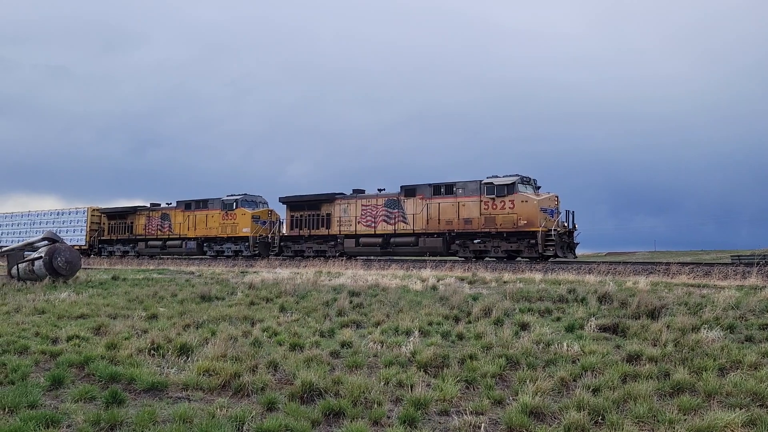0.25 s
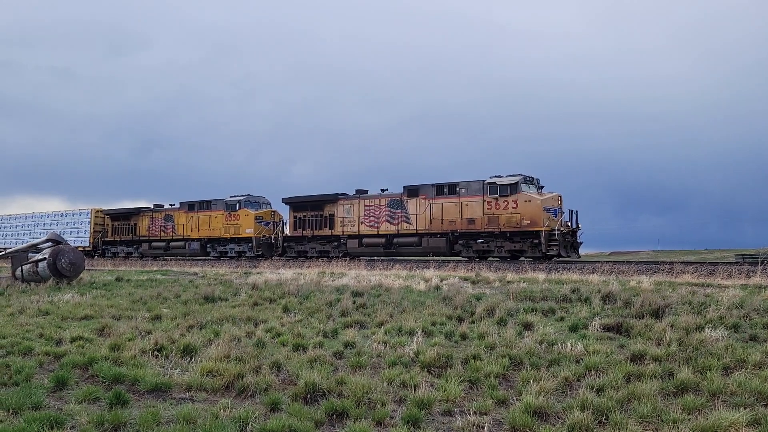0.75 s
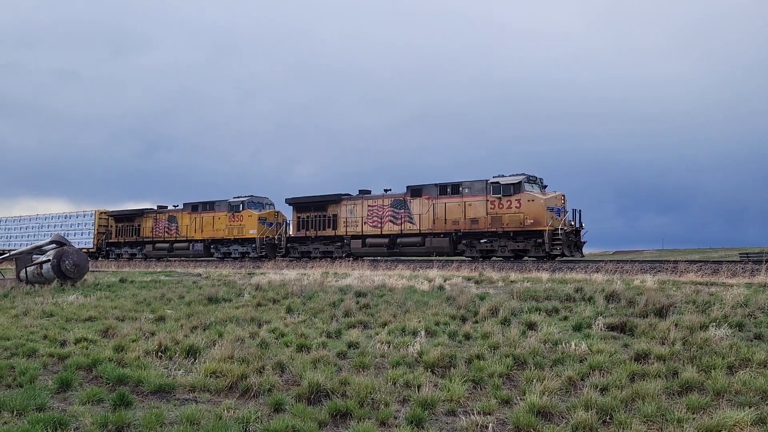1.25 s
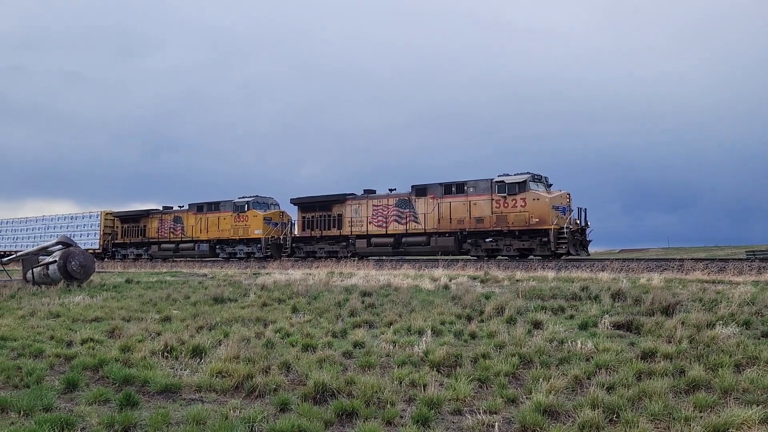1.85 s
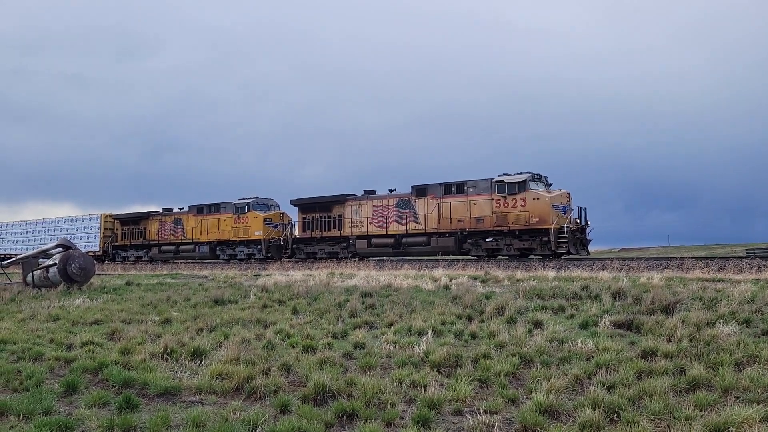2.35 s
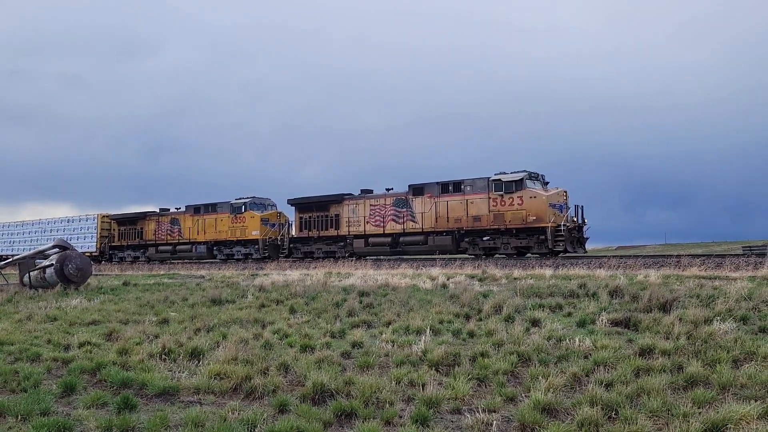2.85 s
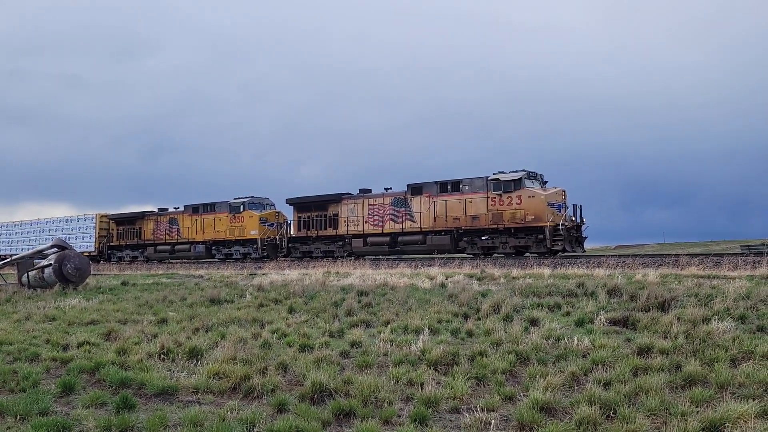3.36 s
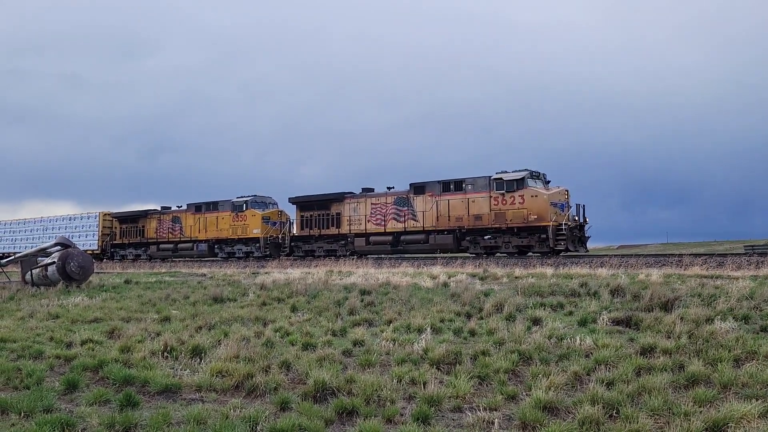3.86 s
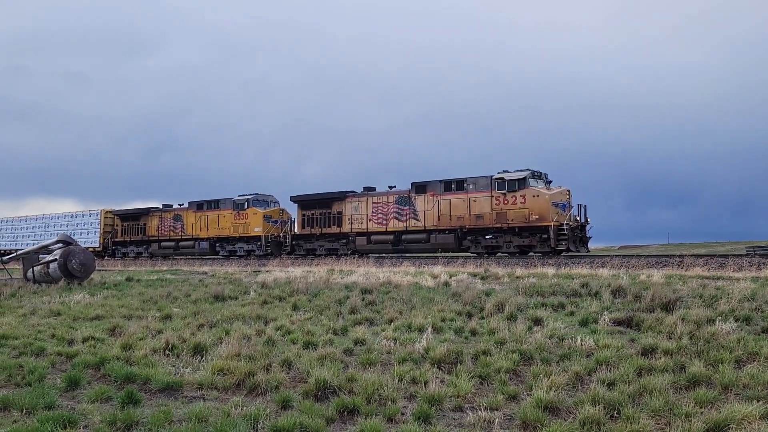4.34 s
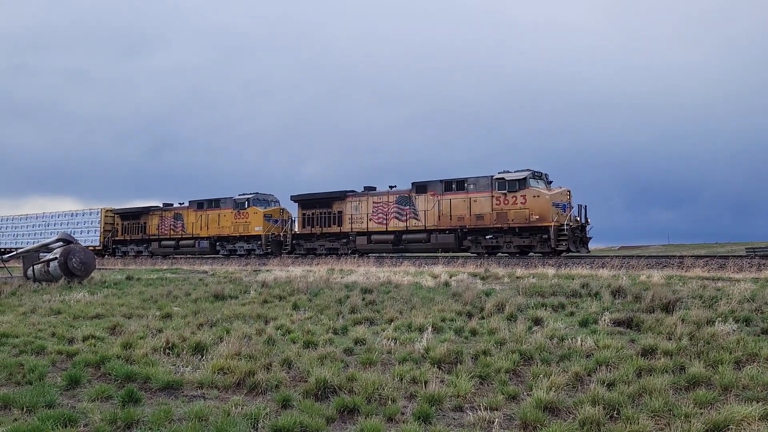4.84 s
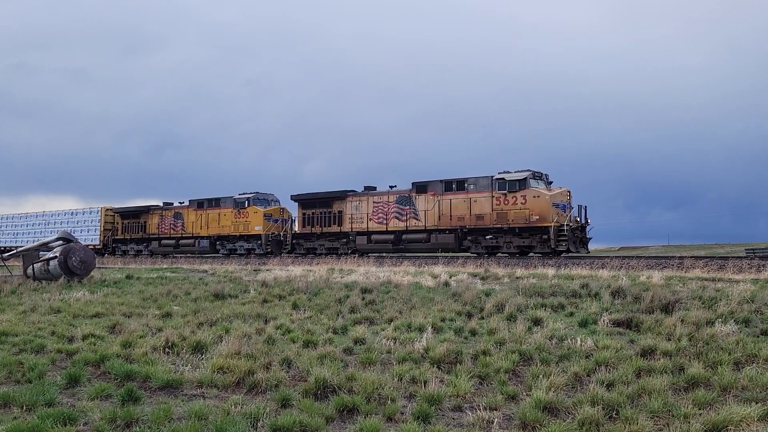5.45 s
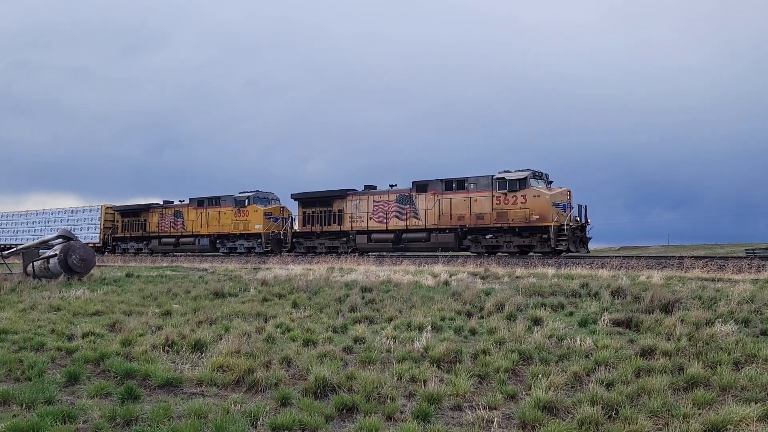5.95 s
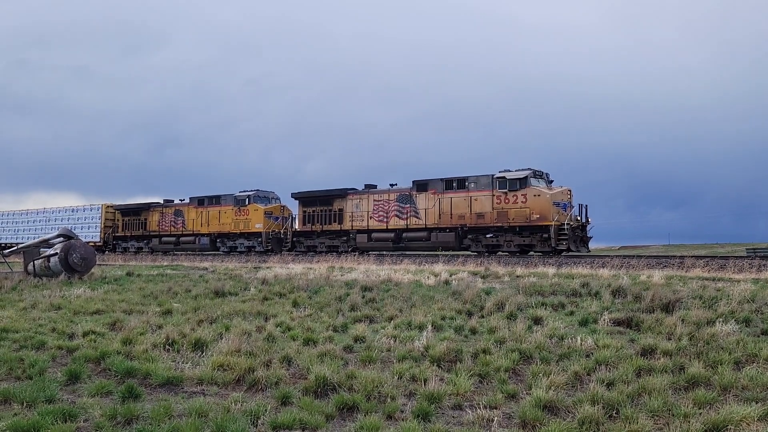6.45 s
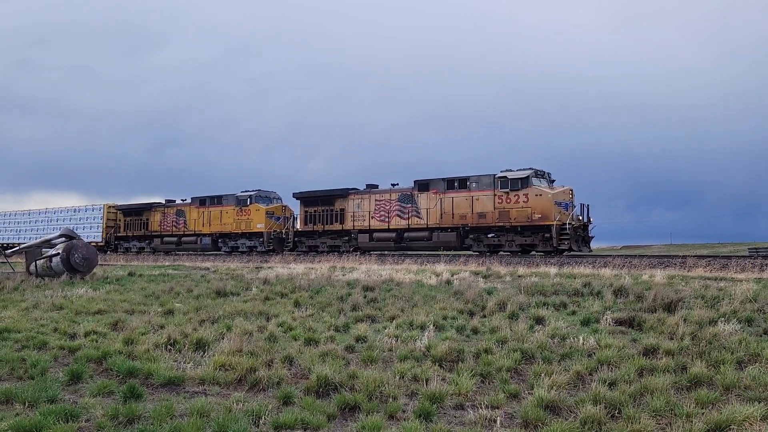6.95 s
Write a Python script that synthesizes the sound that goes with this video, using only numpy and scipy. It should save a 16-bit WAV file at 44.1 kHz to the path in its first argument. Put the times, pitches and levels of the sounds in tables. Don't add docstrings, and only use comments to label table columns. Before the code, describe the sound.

A steady diesel throb fills an open field, its deep exhaust thumps falling in a repeating uneven pattern under mid roar and bright mechanical hiss. Short dry jets of compressed air tick at uneven intervals, the first right at the start, some leaving short echoes. Couplers clunk softly, a wheel groans once after three seconds, and low gusts buffet an exposed handheld stereo microphone, mostly on the right side.

```python
import sys
import numpy as np
from scipy import signal
from scipy.fft import rfft, irfft, next_fast_len
from scipy.io import wavfile
from scipy.ndimage import uniform_filter1d

SR = 44100
rng = np.random.default_rng(int(sys.argv[2]) if len(sys.argv) > 2 else 0)


def how_loud(loudness_db):
    steps = np.asarray(loudness_db, float) / 20
    return 10 ** steps


def master_out(mix):
    frames = np.transpose(np.atleast_2d(mix))
    ceiling = np.clip(frames, -1, 1)
    pcm = np.round(ceiling * 32767).astype(np.int16)
    wavfile.write(sys.argv[1], SR, pcm)


N = 317520
SIZE = next_fast_len(N + 8192)
HZ = np.maximum(np.fft.rfftfreq(SIZE, 1 / SR), 1)
TIME = np.arange(N) / SR
PATTERN_S = 1.0747


def rms_one(x):
    return x / np.sqrt(np.mean(x ** 2) + 1e-20)


def in_time(rows):
    start_s, *columns = np.transpose(rows)
    return [np.interp(TIME, start_s, column) for column in columns]


def at_hz(points):
    hz, value = np.transpose(points)
    return np.interp(np.log(HZ), np.log(np.maximum(hz, 1)), value)


def drift(rate_hz):
    r = np.exp(-80 * np.pi * rate_hz / SR)
    noise = rng.standard_normal(N // 40 + 2002)
    slow = signal.lfilter([1], [1, -2 * r, r * r], noise)[2000:]
    return np.interp(np.arange(N) / 40, np.arange(len(slow)), rms_one(slow))


def resonance(x, hz, width_hz):
    r = np.exp(-np.pi * width_hz / SR)
    poles = [1, -2 * r * np.cos(2 * np.pi * hz / SR), r * r]
    return signal.lfilter([(1 - r * r) / 2, 0, (r * r - 1) / 2], poles, x)


def coloured(x, gain):
    return irfft(rfft(x, SIZE) * gain, SIZE)[..., :N]


def patchy_noise(spectrum, patchy_db, size):
    noise = coloured(rng.standard_normal((2, N)), how_loud(at_hz(spectrum)))
    cells = signal.stft(noise, nperseg=1024, noverlap=768)[2]
    field = rng.standard_normal(cells.shape[1:])
    for axis in (0, 1, 0, 1):
        field = uniform_filter1d(field, size[axis], axis=axis)
    cells = cells * how_loud(patchy_db * rms_one(field))
    return rms_one(signal.istft(cells, nperseg=1024, noverlap=768)[1][:, :N])


# pitch_hz [Hz], left_minus_right_db [dB]
PORT_TILT = [(100, -2.5), (700, -1.5), (1200, -6.5), (1900, -1.5), (2700, 1), (3300, -3.5), (4000, -11),
             (4500, -8), (5500, -8.5), (6800, 1), (8000, -2), (8800, 5.5), (9800, -8.5), (12000, -5)]
# pitch_hz [Hz], lead_rad [radians]
PORT_LEAD = [(0, -1.5), (600, 0.5), (1120, -2), (1380, -1.14), (1890, -2), (2150, -1.52), (3530, -3.5),
             (4310, -9.5), (4910, -12.5), (7150, -22), (8350, -21.5), (10900, -41), (12100, -39),
             (13400, -32)]
# pitch_hz [Hz], likeness [0-1]
PORT_LIKENESS = [(100, 1), (700, 0.64), (1500, 0.98), (2600, 0.46), (4500, 0.6), (6000, 0.2), (9000, 0.06),
                 (14000, 0.8)]


def ports(pair):
    direct, scattered = rfft(pair, SIZE)
    alike = np.clip(at_hz(PORT_LIKENESS), 0, 1)
    side = np.array([[1], [-1]])
    both = np.sqrt((1 + alike) / 2) * direct + side * np.sqrt((1 - alike) / 2) * scattered
    colour = how_loud(side * at_hz(PORT_TILT) / 2)
    delay = np.exp(.5j * side * at_hz(PORT_LEAD))
    return irfft(both * colour * delay, SIZE)[:, :N]


# start_s [s], peak_db [dB]
EXHAUST_BEATS = [(0.0077, -20.4), (0.0658, -26.1), (0.1615, -24.3), (0.3407, -21.4), (0.406, -25.8),
                 (0.5008, -24.2), (0.5716, -25.3), (0.621, -23.2), (0.6551, -25.0), (0.7757, -17.9),
                 (0.8955, -18.4), (0.9545, -24.9), (0.9894, -26.6), (1.0484, -16.6)]


def exhaust(uneven_db=1.96):
    stack_hz, stack_width_hz = 63, 16
    lead = round(PATTERN_S * SR)
    start_s, peak_db = np.transpose(EXHAUST_BEATS)
    at = np.round((start_s + PATTERN_S * np.arange(8)[:, None]) * SR).astype(int)
    clicks = np.zeros(9 * lead)
    clicks[at] = how_loud(peak_db + uneven_db * rng.standard_normal(at.shape))
    rung = resonance(resonance(clicks, stack_hz, stack_width_hz), stack_hz, stack_width_hz)
    peak = np.pi * stack_width_hz / SR * 2 / np.e
    return rung[lead:lead + N] / peak


# strokes_per_pattern [count], first_crest_s [s], roar_depth_db [dB], hiss_depth_db [dB]
FIRING_THROBS = [
    (4, 0.18, 0.1, 0.2),
    (8, 0.00092, 0.5, 0.44),
    (12, .002, 0, 1),
    (16, 0.013, 0.76, 1),
]


def throb(column):
    swell_db = 0
    for row in FIRING_THROBS:
        swell_db = swell_db + row[column] * np.cos(2 * np.pi * row[0] / PATTERN_S * (TIME - row[1]))
    return how_loud(swell_db)


# start_s [s], level_db [dB]
AIR_CARRY = [(0.0, -1), (0.36, 3), (0.92, -1), (1.3, -0.5), (2.0, 2), (2.51, -0.5), (3.23, 1), (3.97, -2),
             (4.35, 0), (5.23, -1), (6.5, -2.5), (7.2, -1)]
# pitch_hz [Hz], level_db [dB per Hz]
ROAR_COLOUR = [(53, -43.5), (90, -7.5), (102, -4.5), (152, -4.5), (240, -14), (269, -22.5), (363, -15),
               (548, -12.5), (581, -10), (829, -8.5), (1070, -15.5), (1220, -9.5), (1460, -17.5),
               (1890, -12.5), (2700, -46.5), (3510, -61.5), (5940, -120)]
# pitch_hz [Hz], level_db [dB per Hz]
HISS_COLOUR = [(1410, -37.5), (2400, -0.5), (2640, -1.5), (3310, 1), (3580, -5), (3970, -8), (4360, -5.5),
               (4970, -3), (5390, -4.5), (6280, -6.5), (7540, -13.5), (8410, -29.5), (9180, -26),
               (10700, -45), (13700, -35.5)]
# pitch_hz [Hz], width_hz [Hz], level_db [dB]
HOUSING_RINGS = [
    (3270, 78, -15.5),
    (4730, 80, -17),
    (6200, 340, -29),
]


def engines():
    air_db, = in_time(AIR_CARRY)
    roar_db = -36 - 0.24 * TIME - 0.11 * air_db
    roar_gain = how_loud(roar_db) * throb(2) * how_loud(1.18 * drift(8.2))
    roar = roar_gain * patchy_noise(ROAR_COLOUR, patchy_db=1.5, size=(3, 12))
    hiss = patchy_noise(HISS_COLOUR, patchy_db=3.0, size=(4, 6))
    white = rng.standard_normal((2, N))
    for hz, width_hz, level_db in HOUSING_RINGS:
        hiss = hiss + how_loud(level_db + 2.0 * drift(12)) * rms_one(resonance(white, hz, width_hz))
    hiss_gain = how_loud(-56 + air_db) * throb(3) * how_loud(0.37 * drift(2))
    return roar + hiss_gain * hiss


# start_s [s], level_db [dB]
BLOWER_WHINE = [(0.0, -46.5), (0.22, -49.5), (0.42, -57), (0.75, -48.5), (1.46, -56.5), (1.7, -44.5),
                (2.38, -71), (2.51, -50.5), (2.85, -50.5), (3.17, -63), (3.27, -52), (4.35, -51.5),
                (4.71, -53.5), (5.17, -48.5), (5.59, -52.5), (6.46, -44.5), (7.04, -59), (7.2, -60)]


def blower():
    blade_hz, whistle_hz, whistle_width_hz = 591.7, 808, 16
    level_db, = in_time(BLOWER_WHINE)
    turn = 2 * np.pi * np.cumsum(blade_hz + .9 * drift(.5)) / SR
    octave = how_loud(-7 + 2 * drift(2)) * np.sin(2 * turn)
    tone = how_loud(level_db + 4.5) * (np.sin(turn) + octave)
    whistle = resonance(rng.standard_normal(N), whistle_hz, whistle_width_hz)
    whistle = resonance(whistle, whistle_hz, whistle_width_hz)
    return tone + how_loud(-53) * rms_one(whistle)


# start_s [s], peak_db [dB], open_s [s], echo_db [dB], nozzle_ring_hz [Hz]
NEAR_SPITS = [(-.016, -26, 0.013, -11.5, 4550), (0.8583, -42, 0.01, 4.5, 5430),
              (1.1505, -35, 0.024, -1.5, 5330), (1.339, -30.5, 0.011, -4.5, 4920),
              (2.0548, -27.5, 0.0053, -4.5, 6430), (2.6726, -30, 0.0052, -7, 6140),
              (3.3386, -35.5, 0.027, 4.5, 4170), (3.622, -32, 0.0099, 0, 5100),
              (4.9064, -29.5, 0.0081, -6.5, 5350), (5.514, -36, 0.008, -0.5, 6870),
              (5.9803, -28.5, 0.0045, -5, 4460), (6.937, -41.5, 0.0089, -0.5, 4450),
              (7.188, -55, 0.01, -22, 4430)]
# start_s [s], peak_db [dB], nozzle_ring_hz [Hz]
DISTANT_SPITS = [(0.7426, -46.5, 3270), (1.4232, -48, 5250), (1.6072, -47.5, 5200), (1.9675, -54, 5400),
                 (3.9674, -48.5, 4930), (4.3075, -53.5, 3390), (5.037, -54, 3260), (5.1821, -57, 5120),
                 (5.7853, -52.5, 3700), (6.1163, -48, 4750), (6.252, -51, 4880)]
# pitch_hz [Hz], level_db [dB per Hz]
JET_COLOUR = [(1350, -31), (2300, -18), (2900, -17.5), (3370, 3.5), (3850, -6), (4120, 1.5), (4470, -1),
              (5080, -1.5), (5510, -2), (6120, 1.5), (7480, -3.5), (8310, -15.5), (9570, -16), (11900, -20),
              (13700, -31.5)]


def drain_valves():
    jet = patchy_noise(JET_COLOUR, patchy_db=3.0, size=(3, 5))
    body_band = signal.butter(2, [1200, 2600], "band", fs=SR, output="sos")
    body = signal.sosfilt(body_band, rng.standard_normal((2, N)))
    low = coloured(jet, HZ < 8200)
    high = coloured(jet, HZ >= 8200)
    high = rms_one(high + how_loud(2.5) * resonance(high, 12300, 1500))
    spits = []
    for start_s, peak_db, open_s, echo_db, ring_hz in NEAR_SPITS:
        treble_db = -17 - 0.3 * (peak_db + 35)
        spits.append((start_s, peak_db, open_s, echo_db, treble_db, ring_hz))
    for start_s, peak_db, ring_hz in DISTANT_SPITS:
        spits.append((start_s, peak_db, 0.022, -10.5, -32.5, ring_hz))
    out = np.zeros((2, N))
    for start_s, peak_db, open_s, echo_db, treble_db, ring_hz in spits:
        on = (TIME > start_s - .016) & (TIME < start_s + .3)
        since = TIME[on] - start_s
        lead_in = how_loud(-26) * (since < 0)
        opening = np.clip((since + 0.0059) / 0.0076, 0, 1) ** 2 + lead_in
        sag_db = 3 * np.abs(since - .003) / open_s
        blow = how_loud(-60 * np.maximum(since - open_s, 0) / .045 - sag_db)
        echo = how_loud(echo_db - 60 * np.abs(since) / 0.23)
        ring = rms_one(resonance(resonance(jet[:, on], ring_hz, 350), ring_hz, 350))
        middle = (blow + echo) * (low[:, on] + how_loud(-11.5) * ring)
        middle = middle + how_loud(2.5) * blow * rms_one(body[:, on])
        dull_echo = how_loud(-4.5 - 60 * np.abs(since) / 0.5) * echo
        treble = how_loud(treble_db + 9.0) * (blow ** 1.8 + dull_echo) * high[:, on]
        out[:, on] += how_loud(peak_db - 10.0) * opening * (middle + treble)
    return out


def gusts(middle_s, hold_s, level_db, calm_db, pace=1):
    rise_db_per_s, die_db_per_s = 259.5, 220.5
    off = TIME[::64, None] - middle_s
    rise_db = rise_db_per_s * np.maximum(-off - hold_s / 2, 0)
    die_db = die_db_per_s * np.maximum(off - hold_s / 2, 0)
    power = how_loud(calm_db) ** 2 + np.sum(how_loud(level_db - pace * (rise_db + die_db)) ** 2, axis=1)
    return np.interp(TIME, TIME[::64], 10 * np.log10(power))


# middle_s [s], hold_s [s], rustle_db [dB], thud_db [dB]
GUSTS_RIGHT = [(.04, .1, -27.5, -34.5), (0.253, 0.05, -23.5, -20), (.6, .34, -32.5, -26),
               (0.805, 0.056, -32, -19.5), (1.1, 0.37, -33.5, -25.5), (1.813, 0.053, -48, -27.5),
               (1.95, 1.5, -40, -30), (2.034, 0.049, -42, -30), (2.586, 0.19, -36, -23.5),
               (2.85, 0.37, -38.5, -26.5), (3.212, 0.092, -29.5, -17), (3.38, 0.33, -29.5, -25),
               (3.54, 0.036, -26, -21.5), (3.93, .2, -32.5, -36.5), (4.118, .08, -31, -22.5),
               (4.408, 0.26, -25, -21.5), (4.593, 0.055, -25.5, -18), (4.803, 0.13, -28.5, -22.5),
               (4.975, .03, -28, -15.5), (5.21, 0.1, -37.5, -38), (5.377, 0.079, -27.5, -21),
               (5.53, 0.34, -36.5, -28.5), (5.729, 0.029, -28.5, -16), (6.165, 0.08, -22, -21),
               (6.423, 0.15, -35.5, -23.5), (6.55, 0.067, -31.5, -26), (6.716, 0.32, -33.5, -26.5),
               (7.055, 0.21, -34, -29)]
# middle_s [s], hold_s [s], rustle_db [dB]
GUSTS_LEFT = [(.04, .1, -32.5), (0.257, 0.14, -35.5), (0.417, .1, -37), (0.816, 0.084, -33.5),
              (1.05, 0.44, -40.5), (2.0, 2, -44), (2.85, .3, -42), (3.353, 0.51, -36), (3.59, 0.034, -28.5),
              (3.846, 0.12, -34.5), (4.136, 0.096, -31.5), (4.307, 0.083, -37.5), (4.548, 0.49, -36),
              (4.953, .15, -32.5), (5.36, 0.066, -34), (5.6, 0.35, -39.5), (6.18, 0.15, -35),
              (6.518, 0.13, -35.5), (6.8, 0.31, -41), (7.1, 0.17, -41.5)]
# pitch_hz [Hz], level_db [dB per Hz]
WIND_COLOUR = [(15, -17.5), (30, -1), (50, 7), (70, 7), (87, 3), (134, -11.5), (265, -24), (366, -26.5),
               (480, -36), (700, -57), (1300, -120)]


def wind():
    calm_db, calm_thud_db = -53, -38
    middle_s, hold_s, rustle_db, thud_db = np.transpose(GUSTS_RIGHT)
    left_db = gusts(*np.transpose(GUSTS_LEFT), calm_db)
    right_db = gusts(middle_s, hold_s, rustle_db, calm_db)
    noise = patchy_noise(WIND_COLOUR, patchy_db=2.0, size=(2, 8))
    low = coloured(noise, HZ < 95)
    rustle = rms_one(noise - low)
    low[0] = .6 * low[1] + .8 * low[0]
    swing = np.sqrt(uniform_filter1d(low ** 2, size=2600) + 1e-9)
    left_thud_db = -31 + 0.38 * (left_db + 39)
    right_thud_db = gusts(middle_s, hold_s, thud_db - 0.5, calm_thud_db, pace=0.92)
    thud = how_loud([left_thud_db, right_thud_db]) * low / swing
    lumps = how_loud(np.array([2.0 * drift(21), 2.0 * drift(33)]))
    return lumps * how_loud([left_db, right_db]) * (rustle - 0.11 * rustle[::-1]) + thud


# start_s [s], peak_db [dB], pitch_hz [Hz]
COUPLER_KNOCKS = [
    (0.0727, -38, 785),
    (0.6794, -33.5, 772),
    (0.7431, -34, 1274),
    (1.8201, -31.5, 1286),
    (2.2394, -37.5, 830),
    (3.8955, -42, 1250),
    (4.1038, -42, 1260),
    (6.12, -34.5, 1238),
    (6.7214, -38, 768),
]


def couplers():
    out = np.zeros(N)
    for start_s, peak_db, hz in COUPLER_KNOCKS:
        since = np.maximum(TIME - start_s, 0)
        strike = np.minimum(since / 0.0013, 1)
        out += how_loud(peak_db + 2 - 60 * since / 0.12) * strike * np.sin(2 * np.pi * hz * since)
    return out


# start_s [s], peak_db [dB]
EDDY_SLAPS = [(0.259, -25), (0.69, -30.5), (3.209, -23), (3.559, -29), (4.169, -47), (4.329, -30),
              (4.613, -21), (4.798, -25), (4.964, -35), (5.351, -28), (5.728, -39), (6.154, -35),
              (6.278, -39), (6.551, -30), (7.115, -24)]


def slaps():
    start_s, peak_db = np.transpose(EDDY_SLAPS)
    clicks = np.zeros(N)
    push_or_pull = rng.choice([-1, 1], len(start_s))
    clicks[np.round((start_s + .004) * SR).astype(int)] = how_loud(peak_db + 39) * push_or_pull
    pulse = signal.sosfilt(signal.butter(1, [70, 160], "band", fs=SR, output="sos"), clicks)
    pulse = signal.sosfilt(signal.butter(2, 450, fs=SR, output="sos"), pulse)
    return pulse * how_loud([[-12], [.1]])


# start_s [s], pitch_hz [Hz], level_db [dB]
FLANGE_GROAN = [
    (3.05, 449, -60.5),
    (3.12, 462, -52),
    (3.22, 519, -44.5),
    (3.3, 536, -66),
]


def flange():
    hz, level_db = in_time(FLANGE_GROAN)
    on = (TIME > FLANGE_GROAN[0][0]) & (TIME < FLANGE_GROAN[-1][0])
    rising = np.sin(2 * np.pi * np.cumsum(hz) / SR)
    steady = how_loud(4.5) * np.sin(2 * np.pi * 390 * TIME)
    return on * how_loud(level_db) * (rising + steady)


def scene():
    thumps = exhaust() * how_loud([[0.1], [.5]])
    tones = ports((blower() + couplers() + flange()) * [[1], [0]])
    valves = ports(drain_valves()) * how_loud([[-1.5], [1.5]])
    return thumps + ports(engines()) + tones + valves + wind() + slaps()


def band_limit(x):
    return signal.sosfilt(signal.butter(12, 15830, fs=SR, output="sos"), x)


def record(dry):
    heard = coloured(dry, how_loud(-2 * np.maximum(HZ - 13800, 0) / 1000))
    self_noise = how_loud(-82) * rng.standard_normal((2, N)) * how_loud([[-1.5], [1.5]])
    return band_limit(heard + self_noise)


dry = scene()
out = record(dry)
master_out(out)
```